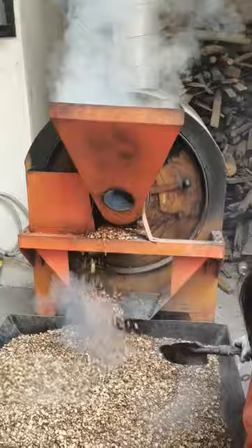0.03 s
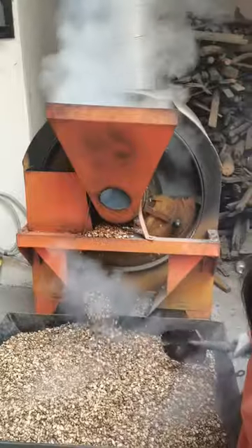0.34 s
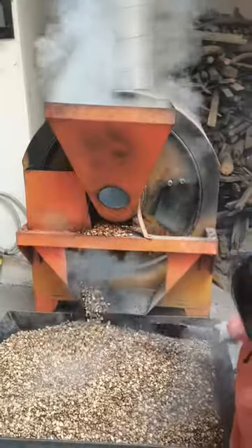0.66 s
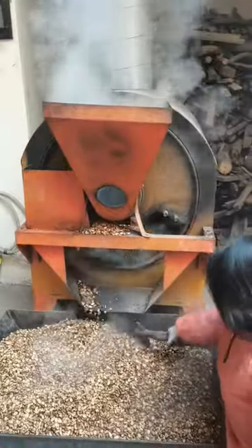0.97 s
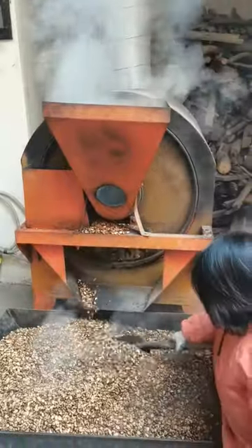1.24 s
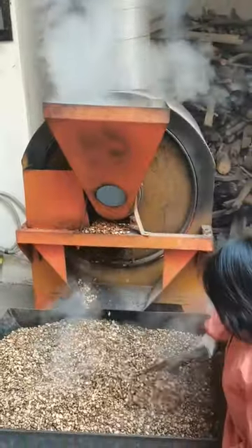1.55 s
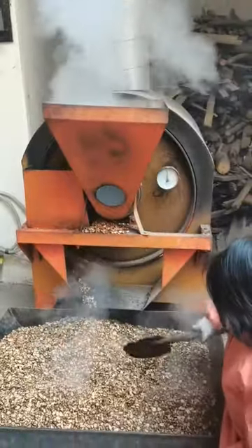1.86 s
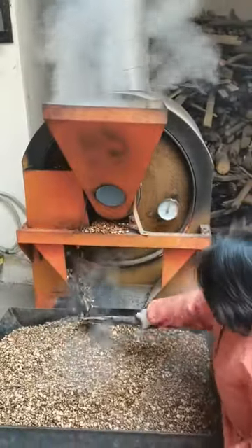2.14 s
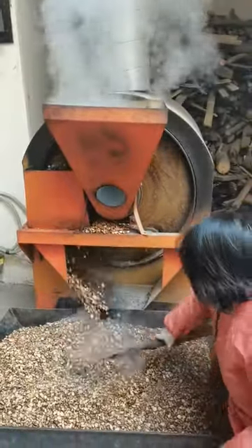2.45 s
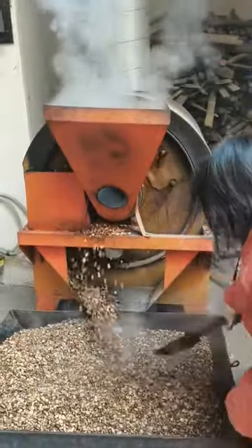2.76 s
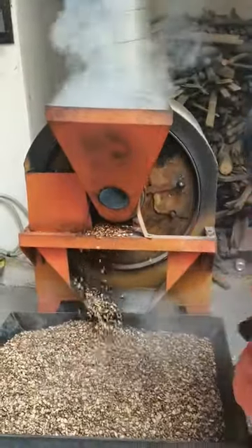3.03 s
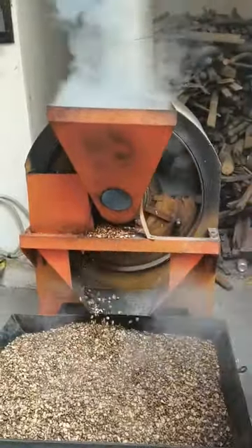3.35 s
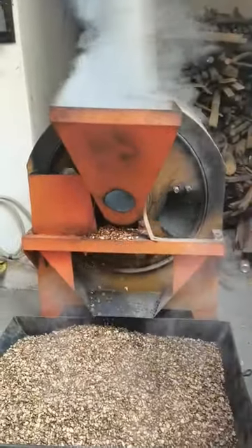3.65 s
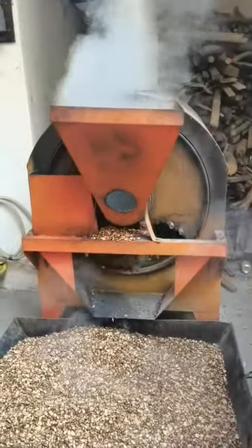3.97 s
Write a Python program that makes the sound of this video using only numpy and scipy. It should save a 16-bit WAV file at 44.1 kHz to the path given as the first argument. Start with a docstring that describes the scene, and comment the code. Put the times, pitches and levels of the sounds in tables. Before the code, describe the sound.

Grains slide and rattle through a rumbling drum roaster while a shovel scrapes and clanks.

```python
"""First, after a moment of silence, roasted grains swell into a slide over ringing steel, above a low rumble:
a drum roaster turning in a shed, a phone microphone close by. Once a turn the load slides over the shell
or thuds against it; in between a thinner stream rattles down the sheet-metal chute into the tray, where
a shovel scrapes through the heap and at last clanks down. Behind it all the drive hums and the fire rushes."""
import sys
import numpy as np
from scipy import signal
from scipy.fft import rfft, irfft
from scipy.io import wavfile
from scipy.ndimage import uniform_filter1d

SR = 44100
rng = np.random.default_rng(int(sys.argv[2]) if len(sys.argv) > 2 else 0)


def store_wav(level_fs):
    """Save 16-bit WAV to argv[1]."""
    pcm = np.round(np.clip(np.atleast_2d(level_fs), -1, 1) * 32767)
    wavfile.write(sys.argv[1], SR, pcm.T.astype(np.int16))


N = 176400

# flow of grains over the shell, one list a slide: t/s, level/dB
SLIDE_FLOWS = [
    [(0.34, -36.5), (0.46, -32), (0.62, -26.5), (0.68, -28.5), (0.81, -22), (0.95, -21.5), (1.19, -22.6),
     (1.23, -30.5), (1.29, -38.5), (1.44, -48)],
    [(3.55, -36.5), (3.69, -32.5), (3.75, -29), (3.84, -26), (3.94, -21.5), (4.0, -20)],
]
# spectrum of grains striking the shell: f/Hz, level/dB
SLIDE_SPECTRUM = [(120, -14.5), (260, -7), (480, -6.5), (900, -3), (1350, -4.5), (2000, -0.5), (2500, -3),
                  (3050, -15), (4200, -17), (5000, -21.5), (7800, -16.5), (10000, -24), (13500, -42.5)]
# modes of the steel shell: f/Hz, level/dB
SHELL_MODES = [(298, -5), (650, 0), (786, -7), (926, 2.5), (1051, 4.5), (1238, 3.5), (1583, 3), (1644, 4),
               (1805, 4.5), (1914, 3.5), (2015, -4), (2169, 2.5), (2292, 5.5), (2378, -3)]
# flow down the chute: t/s, level/dB
POUR_FLOW = [(1.86, -59), (1.93, -40), (2.02, -32.5), (2.07, -36), (2.21, -35), (2.32, -28.5),
             (2.72, -30.5), (2.88, -33.5), (3.09, -38.5), (3.22, -40), (3.32, -45.5), (3.44, -37.5),
             (3.54, -39), (3.75, -42)]
# spectrum of grains striking the chute: f/Hz, level/dB
POUR_SPECTRUM = [(250, -36.5), (520, -13.5), (650, -4), (820, -9), (1150, -0.5), (1500, -4.5), (2200, 3),
                 (2600, -3.5), (3000, -12.5), (4100, -10), (5000, -15.5), (7800, -10), (10000, -15),
                 (13500, -35.5)]
# handfuls that land at once: t/s, level/dB
HANDFULS = [(3.145, -44), (3.214, -39.5), (3.383, -39)]
# modes of the chute: f/Hz, width/Hz, level/dB
CHUTE_MODES = [(394, 51, 1.5), (589, 75, -11), (983.8, 11, 4.5), (1095, 23, -0.5), (1188, 78, -2),
               (1651, 19, 1.5), (2163, 76, -4), (2535, 26, 3)]
# contacts of the shovel: t/s, level/dB, fall/(dB/s)
SHOVEL_CONTACTS = [(.452, -40.5, 153), (1.759, -55.5, 114), (2.005, -41, 177), (2.763, -32.5, 194),
                   (2.962, -29.5, 160), (3.194, -47.5, 245), (3.313, -44.5, 283), (3.371, -51, 218.5),
                   (3.415, -47, 220), (3.553, -24.5, 95), (3.552, -32.5, 520)]
# spectrum of grit on the blade: f/Hz, level/dB
GRIT_SPECTRUM = [(400, -22), (900, 5), (2100, 10.5), (2900, 1), (3600, 4), (5000, 0), (6400, 3.5),
                 (8000, 7), (10000, 1), (13500, -13)]
# modes of the shovel blade: f/Hz, level/dB
BLADE_MODES = [(1956, 2.5), (2380, 3), (3349, -0.5), (4170, -1), (4895, -5), (5563, -1), (6169, 2),
               (7780, 2), (9560, -2)]
# drops of the load against the drum wall: t/s, level/dB
LOAD_DROPS = [(1.452, -32), (1.518, -29.5), (3.281, -31), (3.722, -31), (3.9, -28)]
# low modes of the drum wall: f/Hz, level/dB
WALL_MODES = [(80, 1), (132, 3.5), (178, -1), (242, -2.5)]
# rise and fall of the drum's rumble: t/s, level/dB
RUMBLE_LEVELS = [(0.35, -33), (0.62, -30.5), (0.81, -37), (1.41, -34.5), (1.70, -35), (2.04, -33.5),
                 (2.19, -37.5), (2.45, -35), (2.75, -36.5), (3.35, -37.5), (3.66, -41), (3.76, -31.5),
                 (4.0, -50)]
# spectrum of the rumble: f/Hz, level/dB
RUMBLE_SPECTRUM = [(33, -20), (46, -3), (58, -2.5), (76, 4), (98, 0.5), (135, 4.5), (255, -2), (330, -5),
                   (450, -5), (520, -19), (1000, -21.5)]
# swells of the shell's low modes: centre t/s, length/s, f/Hz, level/dB
SHELL_DRONES = [(0.443, 0.17, 124, -38), (0.674, .11, 124, -35), (1.083, 0.41, 298.6, -38.5),
                (2.097, .16, 416.5, -40), (2.37, 0.28, 408, -41), (2.453, 0.34, 121, -34.5),
                (2.776, 0.32, 396, -38), (3.746, 0.062, 420, -41), (3.805, 0.032, 248, -31.5),
                (3.854, 0.37, 120, -38)]
# hum of the drive: f/Hz, level/dB
DRIVE_TONES = [(48.7, -52.5), (249, -57.5), (452, -53.5), (647, -60.5)]
# spectrum of the rush of fire and turning drum: f/Hz, level/dB
RUSH_SPECTRUM = [(200, 8), (550, -7.5), (750, -6.5), (880, 2), (1200, -7), (2300, -4.5), (3000, -14.5),
                 (4200, -14.5), (5200, -23.5), (8000, -18.5), (13500, -35)]


def slides(mode_width_hz=11.8):
    """Close to the microphone, the load slides over the drum's steel shell and sets it ringing."""
    flow = sum(curve(rows) for rows in SLIDE_FLOWS)
    modes = [(hz, mode_width_hz, db) for hz, db in SHELL_MODES]
    return undb(-2) * stream(flow, SLIDE_SPECTRUM, modes, ring_db=-4.5)


def pour(handful_s=0.022):
    """A thinner stream rattles down the chute; now and then a handful lands at once."""
    handfuls = sum(undb(db) * np.exp(-(2 * (clock() - s) / handful_s) ** 2) for s, db in HANDFULS)
    return undb(-1) * stream(curve(POUR_FLOW) + handfuls, POUR_SPECTRUM, CHUTE_MODES, ring_db=-2.5)


def stream(flow, spectrum, modes, ring_db, clumps_per_s=45, clump_db=1.4):
    """Grains strike steel in clumps, more and harder as the flow grows; other taps keep it ringing."""
    per_s = 3000 * (flow / flow.max() + .1)
    hits = rattle(impacts(per_s, spread_db=-0.5))
    clumped = unit(hits * undb(clump_db * walk(clumps_per_s)))
    taps = impacts(per_s, spread_db=-0.5)
    ringing = ring(taps * flow, modes) / np.std(ring(taps, modes))
    return flow * colour(clumped, spectrum) + undb(ring_db) * ringing


def stray_grains(per_s=150, pitches=16, low_hz=3230, high_hz=11700, width_hz=420):
    """Single grains bounce clear and tick at many pitches, more faintly inside the drum."""
    flow = curve(POUR_FLOW) + undb(-4) * sum(curve(rows) for rows in SLIDE_FLOWS)
    clicks = 0
    for hz in np.geomspace(low_hz, high_hz, pitches):
        tilt_db = -5 * np.log2(hz / low_hz)
        clicks += ring(impacts(per_s / pitches, spread_db=4), [(hz, width_hz, tilt_db)])
    return undb(-15.5) * flow * unit(rattle(clicks))


def shovel(attack_s=.002, judders_per_s=240, judder_db=0.6, mode_width_hz=36):
    """In the tray, each scrape is a burst of grit that sticks and slips on the ringing blade."""
    force = 0
    for s, db, fall in SHOVEL_CONTACTS:
        age = since(s)
        force += np.minimum(age / attack_s, 1) * undb(db - fall * age)
    grit = rattle(impacts(per_s=9000, spread_db=3.8))
    scrape = colour(grit * undb(judder_db * walk(judders_per_s)), GRIT_SPECTRUM)
    modes = [(hz, mode_width_hz, db) for hz, db in BLADE_MODES]
    blade = unit(ring(rng.standard_normal(N), modes))
    return force * (scrape + undb(-3.5) * blade)


def clank(at_s=3.5535, t60_s=0.28):
    """The shovel comes down on the tray's rim, and all the modes of its blade ring off at once."""
    age = since(at_s)
    blade = sum(undb(db) * np.sin(2 * np.pi * hz * age) for hz, db in BLADE_MODES)
    return blade * undb(-36.5 - 60 * age / t60_s)


def thuds(attack_s=0.0035, t60_s=0.17):
    """The load drops against the drum wall and rings its low modes, slightly detuned each time."""
    out = 0
    for s, drop_db in LOAD_DROPS:
        age = since(s)
        wall = sum(undb(db) * np.sin(2 * np.pi * hz * rng.uniform(.95, 1.05) * age)
                   for hz, db in WALL_MODES)
        out += wall * np.minimum(age / attack_s, 1) * undb(drop_db - 60 * age / t60_s)
    return out


def drum(flutter_db=2.4):
    """Dull knocks of the rolling drum merge to a rumble; at times a shell mode drones unsteadily."""
    knocks = impacts(per_s=1500, spread_db=1.5)
    out = undb(-1.5) * curve(RUMBLE_LEVELS) * colour(knocks, RUMBLE_SPECTRUM)
    for s, length, hz, db in SHELL_DRONES:
        swell = np.exp(-(2 * (clock() - s) / length) ** 4)
        tone = wavering_tone(hz, depth=.016, per_s=30)
        out += undb(db) * swell * unit(tone * undb(flutter_db * walk(per_s=40)))
    return out


def drive(waver_db=3):
    """Behind the grains the drive hums, each tone wavering in level and pitch."""
    return sum(undb(db + waver_db * walk(per_s=16)) * unit(wavering_tone(hz, depth=0.0039, per_s=11))
               for hz, db in DRIVE_TONES)


def rush():
    """The fire and the turning drum lay a steady bed of noise under everything."""
    return undb(-47) * colour(rng.standard_normal(N), RUSH_SPECTRUM)


def shed(x, t60_s=0.2, wet_db=-7.5, gap_s=.003):
    """Dense reflections off the machine and the walls reach the microphone just after the direct sound."""
    t = np.arange(SR // 2) / SR
    tail = rng.standard_normal(len(t)) * undb(-60 * t / t60_s) * (t > gap_s)
    reflections = signal.fftconvolve(x, tail / np.linalg.norm(tail))[:N]
    wet = undb(wet_db)
    return (x + wet * reflections) / np.hypot(1, wet)


def impacts(per_s, spread_db):
    """Random impulses of uneven size; rms 1 whatever their rate."""
    chance, size, sign = rng.random(N), rng.standard_normal(N), rng.choice([-1, 1], N)
    strength = undb(spread_db * np.minimum(size, 2)) / np.sqrt(per_s)
    return unit((chance < per_s / SR) * sign * strength)


def rattle(x, stages=14, width_hz=600):
    """Each impact chatters for a millisecond or two: allpass stages keep its colour."""
    for hz in rng.uniform(2000, 13000, stages):
        _, poles = signal.iirpeak(hz, hz / width_hz, fs=SR)
        x = signal.lfilter(poles[::-1], poles, x)
    return x


def ring(x, modes):
    """Resonances (f/Hz, width/Hz, level/dB) driven by x."""
    return sum(undb(db) * signal.lfilter(*signal.iirpeak(hz, hz / width, fs=SR), x)
               for hz, width, db in modes)


def colour(x, spectrum, size=8192):
    """Filter x through (f/Hz, level/dB) points, falling 12 dB an octave beyond them; rms 1."""
    hz, db = np.array(spectrum).T
    octave = np.log2(np.maximum(np.arange(size // 2 + 1) * SR / size, 1))
    beyond = np.maximum(np.log2(hz[0]) - octave, 0) + np.maximum(octave - np.log2(hz[-1]), 0)
    gain = undb(np.interp(octave, np.log2(hz), db) - 12 * beyond)
    cepstrum = irfft(np.log(gain))
    cepstrum[1:size // 2] *= 2  # minimum phase: nothing sounds ahead of an impact
    cepstrum[size // 2 + 1:] = 0
    response = irfft(np.exp(rfft(cepstrum)))
    return unit(signal.fftconvolve(x, response)[:N])


def wavering_tone(hz, depth, per_s):
    """A sine whose pitch wanders by about the fraction depth."""
    return np.sin(2 * np.pi * np.cumsum(hz * (1 + depth * walk(per_s))) / SR)


def walk(per_s):
    """Random steps, smoothed twice; rms 1."""
    hold = int(SR / per_s)
    steps = np.repeat(rng.standard_normal(2000)[:N // hold + 1], hold)[:N]
    return unit(uniform_filter1d(uniform_filter1d(steps, hold), hold))


def curve(rows):
    """Gain along (t/s, level/dB) points, falling 200 dB a second outside them."""
    s, db = np.array(rows).T
    t = clock()
    outside = np.maximum(s[0] - t, 0) + since(s[-1])
    return undb(np.interp(t, s, db) - 200 * outside)


def clock():
    """Time of each sample in s."""
    return np.arange(N) / SR


def since(s):
    """Seconds since time s, zero before it."""
    return np.maximum(clock() - s, 0)


def undb(db):
    """Decibels to gain."""
    return 10 ** (np.asarray(db) / 20)


def unit(x):
    """Scale to rms 1."""
    return x / np.sqrt(np.mean(x ** 2))


def scene():
    """Beside the roaster, in mono: grains with the shed's reflections, shovel and machine dry."""
    grains = shed(slides() + pour() + stray_grains())
    return (grains + shovel() + clank() + drum() + thuds() + drive() + rush())[None]


def record(dry, open_s=.336, dip_hz=8930, dip_width_hz=1200, top_hz=13600):
    """The phone microphone opens after a silent moment, has a narrow treble dip and cuts the top."""
    fade_in = np.minimum(since(open_s) / 0.008, 1)
    notch = signal.iirnotch(dip_hz, dip_hz / dip_width_hz, fs=SR)
    dipped = signal.lfilter(*notch, signal.lfilter(*notch, dry * fade_in))
    return signal.sosfilt(signal.ellip(10, .2, 80, top_hz, fs=SR, output="sos"), dipped)


dry = scene()
out = record(dry)
store_wav(out)
```